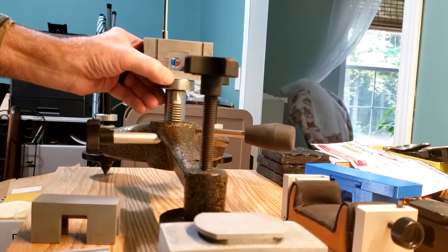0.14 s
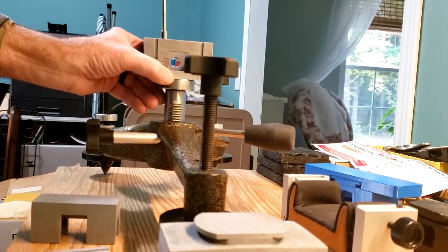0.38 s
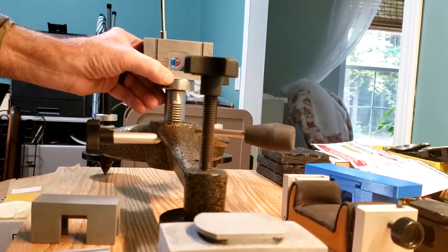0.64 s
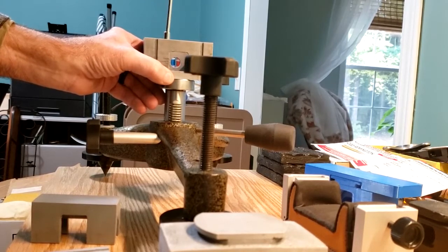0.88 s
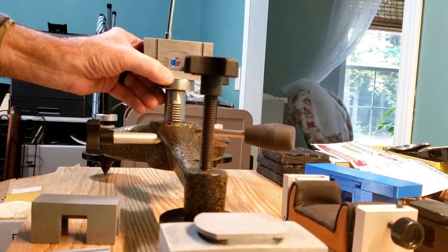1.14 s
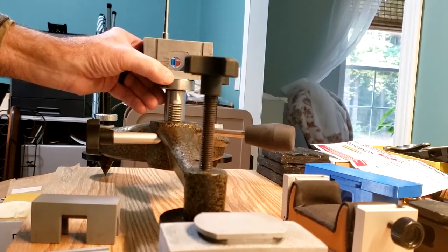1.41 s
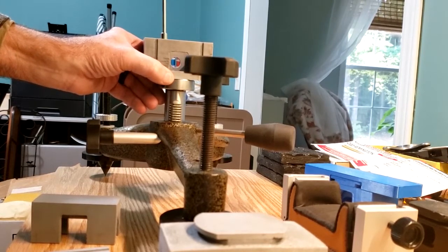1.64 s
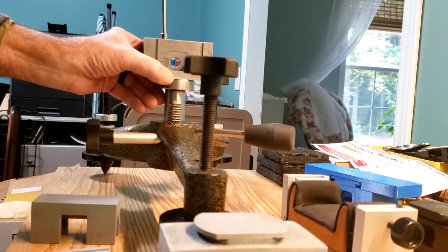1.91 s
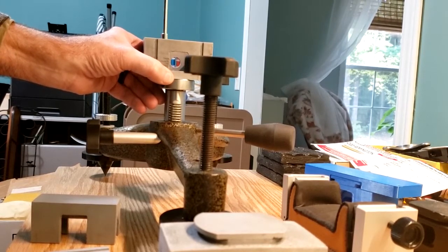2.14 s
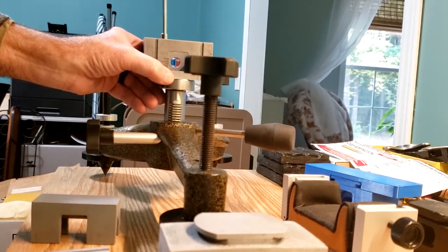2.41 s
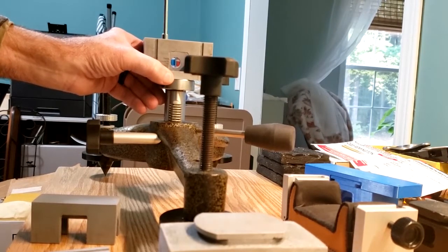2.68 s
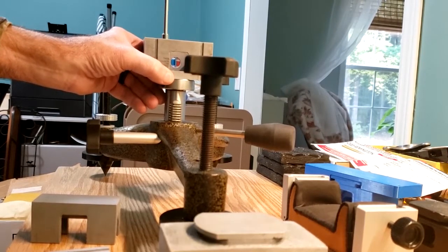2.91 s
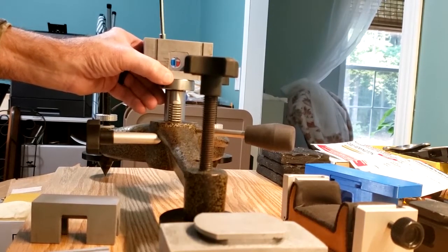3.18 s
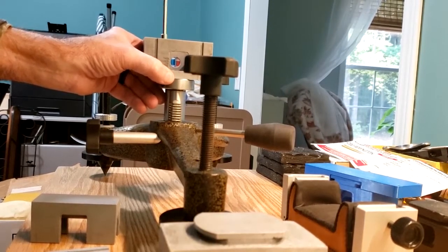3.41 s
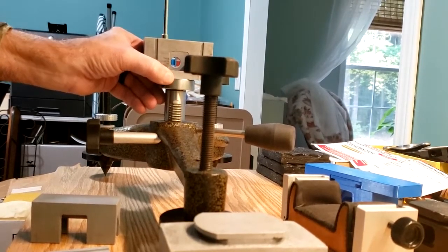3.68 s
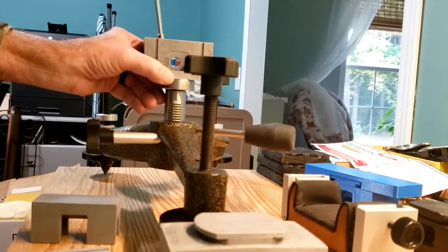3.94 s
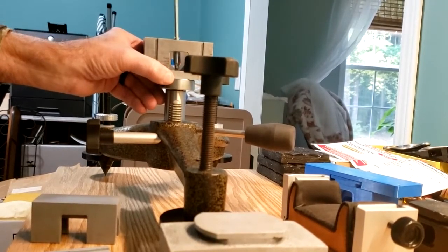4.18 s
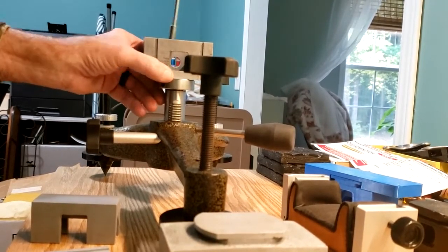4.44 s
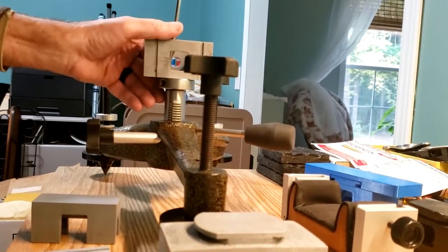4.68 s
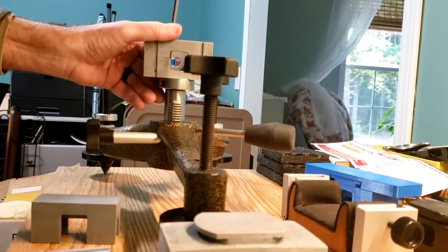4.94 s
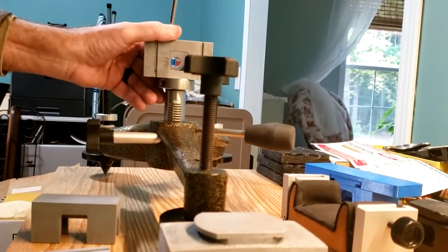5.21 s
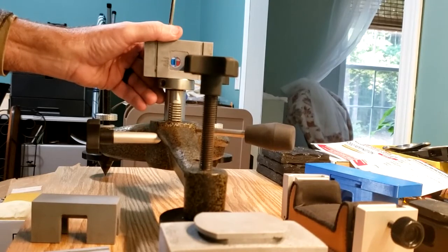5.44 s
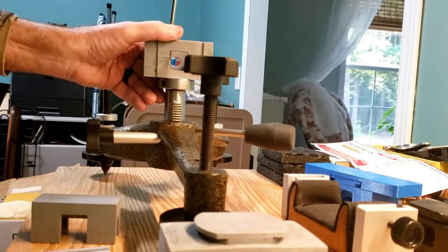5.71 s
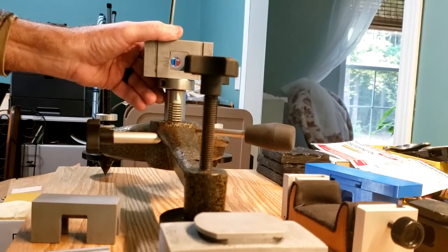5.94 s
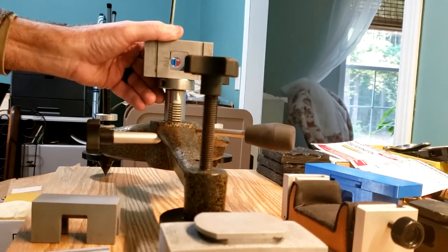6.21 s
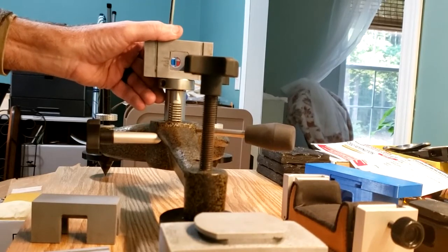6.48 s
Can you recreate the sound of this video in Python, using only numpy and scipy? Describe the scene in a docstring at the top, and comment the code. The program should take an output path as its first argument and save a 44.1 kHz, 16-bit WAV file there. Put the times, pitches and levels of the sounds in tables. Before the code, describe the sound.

Mostly quiet handwork at a wooden table: irregular tiny clicks, gritty thread scrapes and skin rubbing a handle, with low thuds through the tabletop. Two hollow plastic knocks come midway, then a much louder burst of tightly packed cracks, followed by near stillness, a crisp tick and a few faint taps. Soft room hiss, with left-sided cicada shimmer and intermittent katydid buzzing; close, dry stereo.

```python
"""A small quiet room with a window on the left, heard in stereo: cicadas drone and a katydid buzzes outside.
Inside, a hand turns a screw into a plastic block on a metal stand on a wooden table. Blows ring the modes of
block and stand, and noise bursts make the ticks and cracks of the tip; jolts ring the table's modes.
Skin on the handle and scraping thread are grainy noise; the dragging screw feeds noise to the block's modes.
The insects and the room tone are coloured noise."""
import sys
import numpy as np
from scipy import signal
from scipy.fft import rfft, irfft
from scipy.io import wavfile
from scipy.ndimage import uniform_filter1d

SR = 44100
rng = np.random.default_rng(int(sys.argv[2]) if len(sys.argv) > 2 else 0)


def gain_from_db(level_db):
    """Turn a decibel level (scalar or array-like) into a linear amplitude factor."""
    decades = np.asarray(level_db, float) / 20
    return 10 ** decades


def wrap_up_sound(samples):
    """Save the sound to the file named by the first command line argument, as 16-bit audio."""
    columns = np.atleast_2d(samples).T
    # keep every value between -1 and 1, then stretch to whole-number steps
    tamed = np.clip(columns, -1, 1)
    steps = np.round(tamed * 32767).astype(np.int16)
    wavfile.write(sys.argv[1], SR, steps)


N = 290619
TIME = np.arange(N) / SR  # seconds

# Levels in the tables are relative: most layers add a trim of their own.

# room tone and hiss, colour: (frequency [Hz], level [dB per Hz])
HUSH_COLOUR = [(20, -14), (45, -0.5), (120, -14.5), (300, -19), (700, -24.5), (1400, -25), (3000, -27.5),
               (5500, -33.5), (8000, -41.5), (10500, -34), (13500, -25), (16000, -27)]
# bass shared by both microphones, colour: (frequency [Hz], level [dB per Hz])
SHARED_BASS_COLOUR = [(20, 1), (80, 1), (300, -7), (600, -31.5)]
# room reflections, colour: (frequency [Hz], level [dB per Hz])
REFLECTION_COLOUR = [(60, -22.5), (200, -6), (500, -1), (2000, -4.5), (5000, -11), (9000, -10),
                     (16000, -10.5)]
# cicada chorus, colour: (frequency [Hz], level [dB per Hz])
CICADA_COLOUR = [(1300, -33.5), (1550, -17.5), (1750, -5.5), (1950, -2), (2200, -1), (2350, -5.5),
                 (2550, -14), (2750, -25.5), (3000, -46.5)]
# katydid phrases: (start [s], end [s], level [dB])
KATYDID_PHRASES = [(.17, 0.305, -75), (.38, .42, -76), (.54, .65, -74), (.75, 0.806, -76),
                   (1.05, 1.262, -75), (1.31, 1.464, -78), (2, 2.063, -79), (2.1, 2.253, -73),
                   (2.35, 2.58, -75), (2.63, 2.905, -76), (2.97, 3.02, -80), (3.1, 3.224, -76),
                   (3.4, 3.55, -74), (3.65, 3.856, -73), (3.93, 4.1, -73), (4.25, 4.35, -73),
                   (4.42, 4.5, -76), (4.7, 4.83, -76.5), (5, 5.049, -76.5), (5.08, 5.16, -76),
                   (5.25, 5.353, -80), (5.38, 5.45, -81), (5.86, 6.101, -74.5), (6.13, 6.188, -77.5),
                   (6.3, 6.429, -75.5), (6.55, 6.59, -78)]
# katydid wings, colour: (frequency [Hz], level [dB per Hz])
WING_COLOUR = [(12600, -18.5), (13300, -11.5), (14100, 2), (14700, -0.5), (15200, -23)]
# jolts through the table: (time [s], peak level [dB], centre of the struck modes [Hz])
TABLE_JOLTS = [(0.073, -47.5, 116), (0.098, -51.5, 124), (0.376, -43.5, 48.4), (0.399, -47, 129),
               (0.718, -45, 43.1), (0.759, -48.5, 43.1), (0.789, -49, 127), (1.034, -40.5, 105),
               (1.059, -39.5, 64.6), (1.087, -43, 59.2), (1.353, -52.5, 130), (1.513, -55.5, 86.1),
               (1.659, -40.5, 82), (1.7, -44, 53.8), (1.99, -46, 380), (2.169, -38, 118), (2.199, -44, 118),
               (2.256, -47, 385), (2.369, -51, 61.9), (2.563, -34.5, 118), (2.588, -46, 127),
               (2.66, -55.5, 305), (2.813, -56, 190), (3.0, -47.5, 120), (3.285, -42, 121),
               (3.31, -43, 67.3), (3.369, -51, 116), (3.405, -41.5, 116), (3.581, -47, 48.4),
               (3.698, -51, 116), (3.829, -50, 70.0), (3.979, -41.5, 118), (4.039, -49.5, 118),
               (4.07, -31.5, 196), (4.101, -25, 110), (4.13, -21, 116), (4.22, -42, 100), (4.299, -42, 190),
               (5.163, -46, 113), (5.588, -36, 83.4), (5.639, -44, 105), (5.778, -39.5, 127.4),
               (5.829, -54, 118), (6.559, -48, 99.6)]
# the grip shaking the table: (time [s], level [dB])
GRIP_SHAKE = [(0.0, -58), (0.18, -62), (0.3, -72), (0.6, -72), (1.45, -63), (1.62, -67), (2.05, -62),
              (2.42, -63), (2.94, -74), (3.1, -65), (3.27, -70), (3.47, -59), (4.02, -60), (4.16, -50),
              (4.28, -48), (4.55, -67), (4.65, -82), (5.1, -82), (5.25, -66), (5.4, -75), (5.55, -66),
              (5.74, -55), (5.9, -72), (6.05, -82), (6.4, -66), (6.59, -73)]
# ringing of the wooden table: (frequency [Hz], level [dB], 60 dB decay [s], left minus right [dB])
TABLE_MODES = [(48.76, 2.5, .25, -1.3), (62, -1.5, .25, -2), (85.37, -1.5, 0.19, -1.8),
               (113, 3, 0.14, -1.6), (123.2, 4, 0.17, -2), (190, -4.5, 0.22, -1), (297.4, -5, 0.25, 0.83),
               (245, -4, .14, 1), (386, -8, .2, 0)]
# ringing of the plastic block: (frequency [Hz], level [dB], 60 dB decay [s], left minus right [dB])
BLOCK_MODES = [(506.5, -13, 0.12, -8), (622, -8, 0.12, -10), (810, -0.5, 0.08, 7.5),
               (878, 0.5, 0.083, -2.5), (939, -5.5, 0.069, -11.5), (1037, -5, 0.0833, -4),
               (1155.5, -1, 0.054, -14.5), (1230, 5.5, 0.033, -1.5), (1290, -1, 0.07, -11.5),
               (1360, -0.5, 0.065, 6.5), (1460, -10, 0.0696, 3.5), (1680, -5, 0.052, 1)]
# ringing of the metal stand: (frequency [Hz], level [dB], 60 dB decay [s], left minus right [dB])
STAND_MODES = [(1530, 0, .04, 6), (1850, -12.5, 0.047, 13.5), (2070, -0.5, .05, 7), (2303, 4, 0.025, 11),
               (2516, -2, 0.033, 14.5), (3050, 0, 0.034, -1), (6310, -7, 0.06, -14.5),
               (6100, -3, 0.034, -10)]
# slides of the hand: (time of peak [s], time to fall 20 dB [s], fingers on the handle [dB],
# thread scraping [dB], screw dragging [dB])
HAND_SLIDES = [(.154, .15, -79, -79, -70), (.4, .07, -80, -80, -65), (.462, .06, -66, -72.5, -69),
               (.54, .1, -82, -94, -72), (.772, .08, -71, -74, -74), (1.05, .07, -77, -71, -58),
               (1.104, .07, -65, -73, -74), (1.438, .1, -72, -75, -80), (1.71, .1, -70, -72, -60),
               (2.054, .08, -77, -77, -73), (2.15, .05, -73, -92, -84), (2.432, .15, -82, -83, -86),
               (2.63, .2, -71, -74, -68), (2.902, .12, -83, -81, -84), (3.112, .1, -81, -83, -85),
               (3.335, .09, -72, -64, -66), (3.374, .06, -68, -71, -77), (3.572, .07, -67, -76, -73),
               (3.51, .06, -72, -77, -74), (3.7, .1, -74, -78, -79), (3.77, .08, -76, -74, -78),
               (3.96, .06, -72, -74, -72), (4.008, .04, -55.5, -71, -66), (4.338, .04, -62, -49, -64),
               (4.512, .06, -87, -93, -73), (4.564, .08, -85, -75, -81), (5.806, .06, -81, -65, -64),
               (6.2, .07, -99, -104, -79)]
# skin on the handle, colour: (frequency [Hz], level [dB per Hz])
SKIN_COLOUR = [(5000, -34.5), (7500, -16), (9000, -14), (11000, -2.5), (13500, 7), (16000, -13.5)]
# metal tip grating and thread scraping, colour: (frequency [Hz], level [dB per Hz])
METAL_COLOUR = [(1800, -23), (2800, -13.5), (4000, -5.5), (5000, -9.5), (6100, -2.5), (6900, -11),
                (7400, -22.5), (9000, -31)]
# crack on top of a blow, colour: (frequency [Hz], level [dB per Hz])
CRACK_COLOUR = [(6000, -31.5), (7500, -9), (9000, -7.5), (12000, 3), (14000, 2), (16000, -1.5)]
# crunch of block and stand, colour: (frequency [Hz], level [dB per Hz])
CRUNCH_COLOUR = [(150, -16), (270, 0), (400, -3), (560, -10), (850, -2), (1300, -1), (1800, -10),
                 (3200, -20)]
# screwdriver blows: (time [s], block level [dB], centre of the struck block modes [Hz],
# metal tick level [dB], top crack level [dB])
SCREWDRIVER_BLOWS = [(0.057, -62, 810, -82, -82), (0.374, -52.5, 1230, -57.5, -68),
                     (0.701, -52, 826, -60.5, -83), (0.769, -55.5, 899, -68, -70),
                     (1.019, -50, 1220, -50, -64), (1.031, -48, 1220, -56, -68),
                     (1.198, -62, 1130, -87, -82), (1.334, -51.5, 832, -63, -88),
                     (1.392, -57.5, 820, -73, -77), (1.517, -55, 960, -68, -89),
                     (1.648, -58, 1410, -56, -66), (1.657, -51, 780, -44, -55), (1.699, -56, 807, -56, -64),
                     (1.827, -63, 807, -83, -82), (1.975, -50.5, 826, -57, -77),
                     (2.164, -35, 627, -48.5, -56.5), (2.254, -45.5, 1280, -60, -69),
                     (2.326, -55, 1250, -83, -84), (2.562, -32, 622, -42, -50), (2.809, -53, 930, -57, -89),
                     (3.002, -53, 1350, -76, -78), (3.137, -64.5, 1290, -75, -79),
                     (3.255, -54.5, 880, -83, -84), (3.299, -52.5, 1330, -49.5, -56.5),
                     (3.4, -59.5, 910, -77, -74), (3.459, -55, 888, -66, -80),
                     (3.692, -49.5, 1340, -67.5, -64), (4.037, -47, 1350, -42, -48),
                     (4.071, -21, 880, -28.5, -35.5), (4.101, -20, 864, -20, -33),
                     (4.124, -26, 867, -21, -28), (4.13, -22.5, 565, -16.5, -25),
                     (4.298, -43, 1270, -38, -62.5), (4.326, -57, 1360, -37.5, -56),
                     (4.341, -57.5, 1220, -42, -56.5), (5.153, -53, 503, -76, -84),
                     (5.587, -59, 1390, -36, -38), (5.596, -48, 1410, -35, -43),
                     (5.777, -45, 1150, -47.5, -60.5), (5.843, -60, 1030, -80, -82.5),
                     (6.388, -58, 620, -77.5, -84), (6.557, -45, 883, -84, -86)]


def colour(x, points):
    """Filter along the last axis by (Hz, dB) points; white noise of rms 1 comes out near rms 1."""
    hz, db = np.transpose(points)
    bins_hz = np.fft.rfftfreq(x.shape[-1], 1 / SR)
    gain = gain_from_db(np.interp(np.log(bins_hz + 1), np.log(hz), db, left=-90, right=-90))
    return irfft(rfft(x) * gain, x.shape[-1]) / np.sqrt(np.mean(gain ** 2))


def sides(pan_db):
    """Left and right gains for a level difference, left minus right."""
    return gain_from_db(np.array([[pan_db / 2], [-pan_db / 2]]))


def walk(rate):
    """Random levels, `rate` of them a second, joined by slopes; spread near 1."""
    hold = int(SR / rate)
    steps = np.repeat(rng.standard_normal(N // hold + 1), hold)
    return uniform_filter1d(steps, hold)[:N]


def ring(modes, centre_hz, octaves, luck):
    """Stereo impulse response of beating modes, struck hardest near the centre; luck varies each one."""
    hz, db, t60, pan_db = np.transpose(modes)[:, :, None]
    t = TIME[:SR // 4]
    luck = luck[:4 * len(modes)].reshape(4, -1, 1)
    off_centre = np.log2(hz / centre_hz) / octaves
    db = db - np.minimum(6 * off_centre ** 2, 14.0) + 2.5 * luck[0]
    hz = hz * (1 + 0.01 * luck[1])
    turn = 2 * np.pi * hz * t
    size = gain_from_db(db - 60 * t / np.maximum(t60, .01))
    size[::2] *= -1  # neighbouring modes start in opposite directions
    size = size * (1 + 0.6 * np.cos(turn * 0.045 * (1 + 0.3 * luck[2])))  # beating
    skew = 0.35 * luck[3] * np.clip(t / 0.005, 0, 1)  # radians, opposite at the two microphones
    left = gain_from_db(pan_db / 2) * size * np.sin(turn + skew)
    right = gain_from_db(-pan_db / 2) * size * np.sin(turn - skew)
    return np.array([left.sum(0), right.sum(0)])


def add(out, s, db, sound):
    """Mix a sound in from time s, scaled to the given peak level."""
    i = int(s * SR)
    k = min(sound.shape[1], N - i)
    out[:, i:i + k] += gain_from_db(db) * sound[:, :k] / np.abs(sound).max()


def fades(starts, db, rise_s, fall_s):
    """Level in dB of swells that climb and fall 20 dB in the given times; the loudest wins."""
    out = np.full(N, -120.)
    for s, top_db, rise, fall in np.broadcast(starts, db, rise_s, fall_s):
        late = TIME - s
        distance = np.maximum(late / max(fall, .005), -late / max(rise, .001))
        out = np.maximum(out, top_db - 20 * distance)
    return out


def hush():
    """Room tone and microphone hiss: separate noise at each microphone, with partly shared bass."""
    separate = colour(rng.standard_normal((2, N)), HUSH_COLOUR)
    shared = colour(rng.standard_normal(N), SHARED_BASS_COLOUR)
    return gain_from_db(-69.5) * separate + gain_from_db(-78.5) * shared


def room(x, t60, wet_db, gap):
    """Reflections as fading noise, different at each microphone, that builds up over gap seconds."""
    t = TIME[:SR]
    envelope = gain_from_db(-60 * t / t60) * np.clip(t / gap, 0, 1)
    tail = colour(rng.standard_normal((2, SR)), REFLECTION_COLOUR) * envelope
    middle = x.mean(0)[None]
    return x + gain_from_db(wet_db) * signal.fftconvolve(middle, tail)[:, :N]


def cicadas():
    """A far chorus blurs into a shimmering band; only a little of it, inverted, reaches the right side."""
    level_db = -59.0 + 1.2 * walk(40) + .7 * walk(3)
    drone = colour(rng.standard_normal(N), CICADA_COLOUR) * gain_from_db(level_db)
    return np.array([drone, -gain_from_db(-32) * drone])


def katydid():
    """Wing strokes about 30 a second, each a puff of noise near 14 kHz, far to the left."""
    level = np.zeros(N)
    for start, end, db in KATYDID_PHRASES:
        t = np.clip(TIME - start, 0, end - start)
        phrase = np.abs(np.sin(np.pi * t / (end - start))) ** .4
        wing_strokes = .25 + np.sin(np.pi * 30.2 * t) ** 2
        level += gain_from_db(db) * phrase * wing_strokes
    wing = colour(rng.standard_normal(N), WING_COLOUR)
    return sides(20.0) * level * wing * gain_from_db(-3.0)


def table(shake_db):
    """Soft jolts of the stand ring the table top; the gripping hand keeps it shaking a little."""
    out = np.zeros((2, N))
    push = np.hanning(int(0.002 * SR))[None]  # a soft 2 ms push
    for (s, db, hz), luck in zip(TABLE_JOLTS, rng.standard_normal((len(TABLE_JOLTS), 40))):
        add(out, s, db + 0.5, signal.fftconvolve(ring(TABLE_MODES, hz, 0.64, luck), push))
    resonance = ring(TABLE_MODES, 70, 1.7, rng.standard_normal(40))
    shake = signal.fftconvolve(resonance, rng.standard_normal((1, N)))[:, :N]
    return out + gain_from_db(shake_db - 3.0) * shake / shake.std()


def strokes():
    """Levels over time of fingers, thread and drag; every blow also leaves the screw dragging."""
    rise_share = .9  # a slide builds up in this share of its falling time
    drag_db_from_blow, drag_fade_db_per_s = -12, 280
    s, fall, *levels = np.transpose(HAND_SLIDES)
    skin_db, thread_db, drag_db = (fades(s, db, rise_share * fall, fall) for db in levels)
    blow_s, block_db = np.transpose(SCREWDRIVER_BLOWS)[:2]
    after_db = fades(blow_s + .01, block_db + drag_db_from_blow, .004, 20 / drag_fade_db_per_s)
    return uniform_filter1d([skin_db, thread_db, np.maximum(drag_db, after_db)], size=400)


def friction(db, spectrum, pan_db):
    """A grainy sliding hiss: coloured noise, partly shared by the sides, with a flickering level."""
    grain = rng.standard_normal((2, N))
    grain[0] = 0.21 * grain[1] + .8 * grain[0]
    return sides(pan_db) * gain_from_db(db + 0.83 * walk(84)) * colour(grain, spectrum)


def screw_drag(drag_db):
    """Between blows the screw drags unevenly in its hole: noisy slips ring the block's modes."""
    slips = rng.standard_normal((1, N)) * gain_from_db(4.0 * walk(80))
    resonance = ring(BLOCK_MODES, 1100, 1.5, rng.standard_normal(60))
    drag = signal.fftconvolve(resonance, slips)[:, :N]
    return gain_from_db(drag_db - 6.0) * drag / drag.std()


def screwdriver():
    """Each blow is a first strike and a short chatter: block and stand ring, the tip grates and cracks."""
    contact_s, contact_s_per_db = .0075, -.0001  # chatter of a -45 dB blow; harder blows are shorter
    out, t = np.zeros((2, N)), TIME[:4096]
    grits = rng.standard_normal((len(SCREWDRIVER_BLOWS), 3, 4096))
    for (s, block_db, hz, tick_db, crack_db), grit in zip(SCREWDRIVER_BLOWS, grits):
        contact = np.clip(contact_s + contact_s_per_db * (block_db + 45), .0005, .04)
        fade = np.exp(-t / contact) * (1 - np.exp(-t / (0.13 * contact)))
        push = 0.11 * grit[0] * fade  # chatter
        push[20] += 1  # first strike
        block = signal.fftconvolve(ring(BLOCK_MODES, hz, 0.21, grit[1]), push[None])
        add(out, s, block_db + 1.0, block)
        # the many small modes blur into a crunch
        crunch = colour(grit[1:] + 1.2 * grit[0], CRUNCH_COLOUR)
        add(out, s, block_db - 7.0, crunch * np.exp(-t / 0.025) * np.clip(t / .002, 0, 1))
        # the stand feels both the knock and the tick
        stand = signal.fftconvolve(ring(STAND_MODES, 3000, 1.5, grit[2]), push[None])
        add(out, s, (block_db + tick_db) / 2 + 5.0, stand)
        # the tip keeps grating faintly after the strike
        grate = fade ** 2.06 + gain_from_db(-18) * np.exp(-t / 0.038)
        tick = sides(-12.0) * colour(grit[1:] + 0.95 * grit[0], METAL_COLOUR)
        add(out, s, tick_db + 8.0, tick * grate)
        crack = sides(-7.5) * colour(grit[1:] + 1.5 * grit[0], CRACK_COLOUR)
        add(out, s, crack_db + 11.0, crack * grate)
    return out


def scene():
    """The work and the table in the room's reflections, over the insects and the room tone."""
    skin_db, thread_db, drag_db = strokes()
    work = screwdriver() + screw_drag(drag_db)
    work += friction(skin_db + 4.5, SKIN_COLOUR, -7.5)
    work += friction(thread_db + 1.0, METAL_COLOUR, -8.5)
    work[1] = np.roll(work[1], shift=5)  # samples: the left microphone hears the work first
    wood = table(np.interp(TIME, *np.transpose(GRIP_SHAKE)))
    wood[1] = np.roll(wood[1], shift=13)  # samples: the slower wave in the wood lags more
    indoors = room(work + wood, t60=0.26, wet_db=-39, gap=.006)
    return indoors + cicadas() + katydid() + hush()


def low_pass(x):
    """Removes everything above the highest recorded frequency."""
    return signal.sosfilt(signal.butter(12, 16630, fs=SR, output="sos"), x)


def record(dry):
    """The microphones lose the deepest bass, below about 42 Hz."""
    bass_cut = signal.butter(3, 42, "high", fs=SR, output="sos")
    mix = signal.sosfilt(bass_cut, dry)
    return low_pass(mix)


dry = scene()
out = record(dry)
wrap_up_sound(out)
```